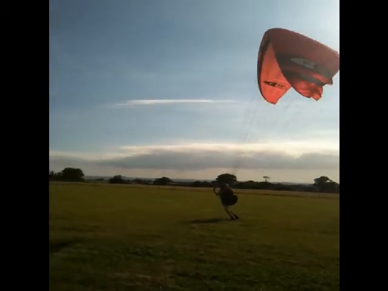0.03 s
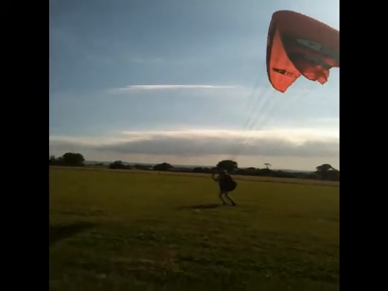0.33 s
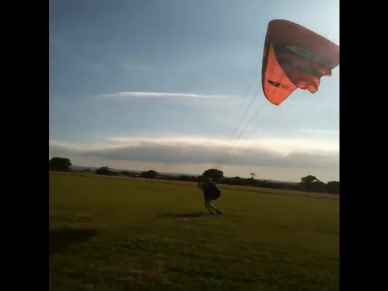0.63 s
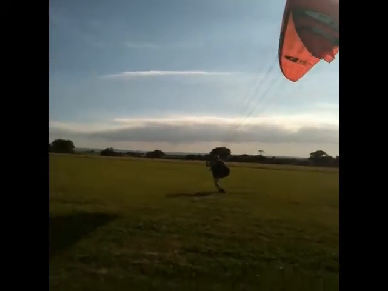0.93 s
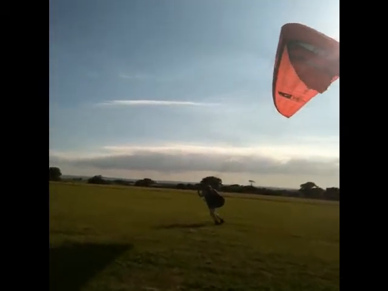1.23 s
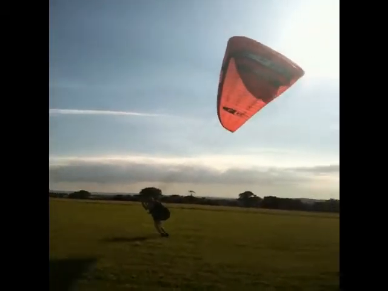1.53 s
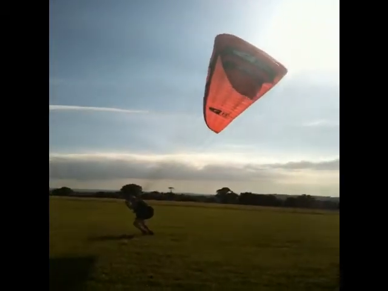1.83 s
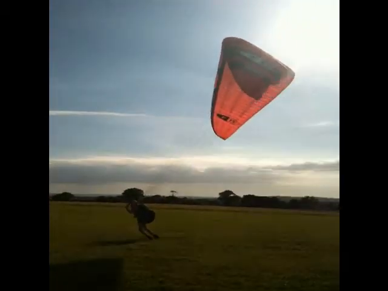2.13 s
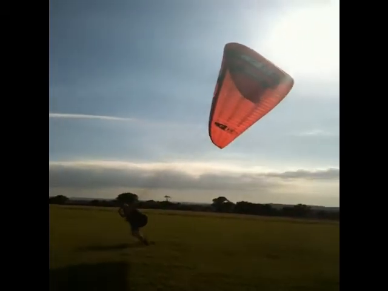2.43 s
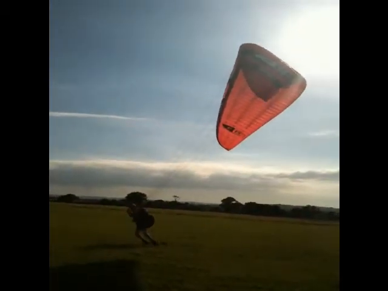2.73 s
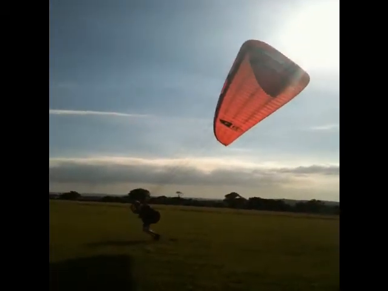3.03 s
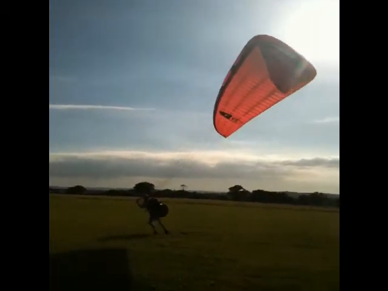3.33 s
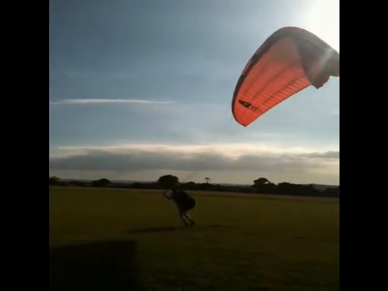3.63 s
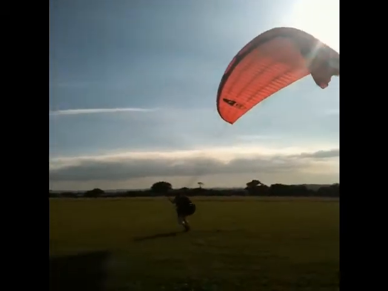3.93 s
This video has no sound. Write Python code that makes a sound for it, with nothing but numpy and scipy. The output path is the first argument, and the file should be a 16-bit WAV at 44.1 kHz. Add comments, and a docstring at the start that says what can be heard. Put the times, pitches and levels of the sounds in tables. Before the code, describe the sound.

Wind buffets the microphone throughout with a dull rumble, sputter and short thumps. It starts in uneven puffs, blows hardest from about 0.9 to 2.3 seconds, then comes in separate gusts and weakens after 3.4 seconds. Behind it, a paraglider's cloth swishes faintly, swelling near 1.4, 2.2 and 3.1 seconds, with a few tiny ticks and a barely audible whistle from its lines. A soft outdoor hush lies underneath.

```python
"""Dull rumble, sputter and single thumps: gusty wind buffets a small microphone in an open field.
Each is the pressure of eddies hitting the microphone, thinned by its bass cut.
Nearby a fabric wing is flown: its cloth swishes in swells and ticks, and its lines whistle faintly.
A soft draught and the steady air over the field lie underneath."""
import sys
import numpy as np
from scipy import signal
from scipy.fft import rfft, irfft
from scipy.io import wavfile

SR = 44100
rng = np.random.default_rng(int(sys.argv[2]) if len(sys.argv) > 2 else 0)


def unload_audio(sound):
    """Save the sound as a 16-bit wav file, at the path given as the first command line argument."""
    columns = np.transpose(np.atleast_2d(sound))
    # keep every value between -1 and 1, then stretch to whole-number steps
    steps = np.round(np.clip(columns, -1, 1) * 32767)
    wavfile.write(sys.argv[1], SR, steps.astype(np.int16))


N = 176400
T, HZ = np.arange(N) / SR, np.fft.rfftfreq(N, 1 / SR) + 1e-3


def amp(db):
    """Decibels to gain."""
    return 10 ** (np.asarray(db) / 20)


def unit(x):
    """Scales to rms 1."""
    return x / np.sqrt(np.mean(x ** 2) + 1e-20)


def add(mix, start_s, sound):
    """Mixes a sound in at a time."""
    part = mix[max(round(start_s * SR), 0):][:len(sound)]
    part += sound[:len(part)]


def colour(x, curve):
    """Shapes a signal with an EQ curve of (frequency [Hz], gain [dB]), then scales it to rms 1."""
    hz, db = np.transpose(curve)
    gain = amp(np.interp(np.log(HZ), np.log(hz), db))
    return unit(irfft(rfft(x) * gain, N))


def noise(curve):
    """White noise through an EQ curve."""
    return colour(rng.standard_normal(N), curve)


def band(hz, octaves, size=N):
    """Noise in one bell-shaped band."""
    bins = np.fft.rfftfreq(size, 1 / SR) + 0.0012
    bell = np.exp(-.5 * (np.log2(bins / hz) / octaves) ** 2)
    return unit(irfft(rfft(rng.standard_normal(size)) * bell, size))


def flicker(depth_db, rate_hz):
    """A gain that drifts at random, up to about the given rate."""
    drift = irfft(rfft(rng.standard_normal(N)) / (1 + (HZ / rate_hz) ** 4), N)
    return amp(depth_db * unit(drift))


def steady(x, smooth_s=0.0066):
    """Evens out chance swells, so that the gusts set the level."""
    window = np.exp(-.5 * (np.arange(-4000, 4001) / SR / smooth_s) ** 2)
    power = signal.fftconvolve(x ** 2, window / window.sum(), "same")
    return x / np.sqrt(abs(power) + 1e-12)


def bass_cut(x, ring_hz=196, q=1.234, port_hz=79):
    """The microphone's bass cut: every push swings back and rings briefly."""
    w = 2 * np.pi * ring_hz / SR
    ringing = signal.lfilter(*signal.bilinear([1, 0, 0], [1, w / q, w * w]), x)
    return signal.lfilter(*signal.butter(1, port_hz, "high", fs=SR), ringing)


def buffeting(eddies_per_s=600, spread_db=5, full_gust_db=-20.5):
    """Large eddies rumble on the microphone and small ones sputter, in the same lumps."""
    # wind strength at the microphone, in two consecutive lists (time [s], relative level [dB])
    gusts = [
        [(0.0, -18.5), (0.02, -14.5), (0.1, -22), (0.25, -31.5), (0.28, -24), (0.31, -34), (0.32, -37),
         (0.40, -26), (0.425, -40.5), (0.47, -24.5), (0.535, -18), (0.555, -37), (0.63, -36), (0.65, -34.5),
         (0.7, -28), (0.78, -30.5), (0.85, -27), (0.9, -14.5), (0.97, -25.5), (1.01, -25.5), (1.06, -37),
         (1.09, -22.5), (1.155, -33.5), (1.175, -19.5), (1.205, -32.5), (1.225, -12.5), (1.245, -30.5),
         (1.27, -21.5), (1.345, -13), (1.38, -19), (1.45, -14.5), (1.5, -20.5), (1.57, -16), (1.59, -21),
         (1.71, -20.5), (1.77, -23), (1.79, -37.5), (1.82, -27), (1.84, -47.5), (1.88, -20.5), (1.893, -37),
         (1.925, -20.5), (1.942, -33), (1.96, -17), (2.0, -17.5)],
        [(2.012, -29), (2.04, -17), (2.053, -28), (2.075, -17), (2.1, -19), (2.13, -16.5), (2.154, -18.5),
         (2.248, -21.5), (2.342, -39), (2.374, -32.5), (2.398, -50), (2.436, -36), (2.452, -34), (2.486, -21),
         (2.552, -22.5), (2.592, -65), (2.68, -27), (2.696, -45), (2.73, -30), (2.79, -37.5), (2.868, -21),
         (2.902, -36.5), (2.985, -23.5), (3.034, -27), (3.046, -37.5), (3.09, -18), (3.156, -32), (3.184, -44),
         (3.222, -36.5), (3.262, -24.5), (3.275, -39.5), (3.296, -17), (3.334, -30.5), (3.362, -23.5),
         (3.39, -37), (3.49, -28), (3.522, -53), (3.538, -32), (3.594, -59.5), (3.638, -27), (3.666, -54),
         (3.684, -42.5), (3.9, -37.5), (3.91, -52), (4.0, -44)],
    ]
    # pressure spectrum of the large eddies (frequency [Hz], relative level [dB])
    rumble_eq = [(25, 7), (45, 0), (75, -18), (120, 4.5), (180, 4), (280, -6), (420, -10), (600, -26.5),
                 (900, -32.5), (1600, -45.5), (4000, -104)]
    # pressure spectrum of the small eddies (frequency [Hz], relative level [dB])
    sputter_eq = [(100, 18), (300, -10.5), (520, 2), (750, -9), (1100, -22.5), (1500, -34), (2400, -40.5),
                  (4000, -51.5), (12000, -74)]
    gust_db = np.interp(T, *np.vstack(gusts).T)
    lumps = flicker(depth_db=3, rate_hz=80)
    rumble = steady(bass_cut(noise(rumble_eq))) * amp(gust_db - 3)
    hits = (rng.random(N) < eddies_per_s / SR) * rng.choice([-1, 1], N)
    eddies = hits * amp(spread_db * rng.standard_normal(N))
    # the sputter gains on the rumble as the wind rises
    sputter_db = gust_db - 14 + 0.53 * (gust_db - full_gust_db)
    sputter = steady(bass_cut(colour(eddies, sputter_eq))) * amp(sputter_db)
    return lumps * (rumble + sputter)


def thumps(rise=1.806, lead_s=.01):
    """Each strong eddy is one pressure push: a quick rise and a slower fall."""
    # strong single eddies (time [s], relative peak [dB], fall time [ms])
    strong_eddies = [(0.0227, -10, 0.62), (0.0693, -10.5, 0.9), (0.1179, -6, 0.93), (0.1414, -11.5, 0.82),
                     (0.273, -8, 1), (0.327, -12.5, 0.82), (0.4707, -8, 0.73), (0.5344, -13.5, 0.59),
                     (0.7048, -11.5, 0.99), (0.8765, -15, 0.62), (.891, -15.5, 0.39), (0.8973, 1.5, 0.54),
                     (0.9234, -8.5, 0.51), (0.933, -8, .8), (0.952, -13.5, 0.27), (1.1693, -9, 0.79),
                     (1.179, -11, 0.64), (1.217, -22, 0.35), (1.2309, -4.5, 0.78), (1.266, -11.5, .65),
                     (1.3366, -7, 0.62), (1.3491, -8, 0.4), (1.3625, -6, 0.42), (1.377, -12, 0.32),
                     (1.4205, -12, 0.33), (1.452, -7.5, 0.52), (1.468, -13, 0.37), (1.507, -12.5, 0.51),
                     (1.5562, -9.5, 0.32), (1.5656, 0.5, 0.42), (1.567, -17, 0.15), (1.581, -15.5, 0.32),
                     (1.643, -15, 0.44), (1.6663, -6, 0.5), (1.6957, -6.5, 0.55), (1.7234, -10.5, 0.64),
                     (1.73, -10.5, .36), (1.7399, -9, 0.28), (1.7503, -6.5, 0.5), (1.763, -12.5, 0.34),
                     (1.8245, -18.5, 0.34), (1.8779, -17, 0.53), (1.964, -3.5, 0.55), (1.976, -19, 0.29),
                     (1.997, -4.5, 0.64), (1.9999, -16, 0.23), (2.041, -5, 0.7), (2.0768, -4.5, 0.76),
                     (2.1131, -12, 0.41), (2.1246, -5.5, 0.9), (2.133, -17, 0.31), (2.172, -10, 0.31),
                     (2.219, -22, .22), (2.245, -5.5, 0.56), (2.464, -5.5, 0.72), (2.4893, -3.5, 1),
                     (2.494, -9, 1), (2.7431, -20.5, 0.45), (2.862, -14, 0.74), (2.873, -10.5, 1),
                     (2.9381, -7.5, 0.95), (2.978, -4, 0.7), (2.9885, -9.5, 0.92), (3.0178, -11.5, 0.73),
                     (3.0854, -2.5, 0.98), (3.0963, -11.5, 1), (3.117, -17, 0.99), (3.225, -14, 1),
                     (3.291, -5.5, 0.46), (3.2983, -20.5, 0.18), (3.353, -11, 0.39), (3.4175, -14.5, 0.69),
                     (3.477, -13, 0.87), (3.486, -23, 0.73)]
    out = np.zeros(N)
    ms = (T[:2000] - lead_s) * 1000
    for s, db, fall_ms in strong_eddies:
        age = ms / fall_ms
        push = np.exp(-np.logaddexp(-rise * age, age))
        thump = bass_cut(push)
        add(out, s - lead_s, amp(db - 4) * thump / abs(thump).max())
    return out


def flurries(taper=3.5):
    """Tight clusters of eddies rasp over the microphone and are gone."""
    # clusters of small eddies (middle [s], length [s], relative level [dB], band centre [Hz])
    clusters = [(0.021, 0.024, -30.5, 540), (0.457, 0.0065, -29, 410), (0.476, 0.011, -35.5, 600),
                (.52, 0.024, -44, 260), (0.614, 0.017, -29, 284), (0.732, 0.0096, -25.5, 396),
                (.89, 0.02, -22, 440), (0.992, 0.0056, -22.5, 438), (1.1, 0.025, -33, 280),
                (1.177, 0.0051, -31, 426), (1.226, .012, -38, 485), (1.314, 0.014, -29.5, 490),
                (1.345, 0.028, -24.5, 404), (1.421, 0.0051, -22, 596), (1.568, 0.018, -30, 633),
                (1.666, 0.0065, -29.5, 470), (1.738, 0.033, -32, 704), (1.824, 0.0047, -28, 574),
                (1.954, 0.0073, -14, 242), (1.968, 0.0065, -24.5, 820), (1.99, 0.011, -21.5, 730),
                (2.038, 0.0099, -28, 390), (2.08, 0.018, -33, 440), (2.11, 0.012, -27, 584),
                (2.294, 0.0072, -27, 275), (2.324, 0.013, -33, 215), (2.366, 0.012, -24.5, 180),
                (2.505, 0.014, -27, 400), (2.533, 0.013, -22, 344), (2.676, 0.017, -37.5, 480),
                (2.744, 0.011, -36.5, 430), (2.826, 0.011, -30.5, 265), (3.244, 0.0095, -31.5, 387),
                (3.294, 0.013, -28, 780), (3.316, 0.0061, -26.5, 333), (3.419, 0.02, -35, 423),
                (3.632, 0.017, -38.5, 270), (3.682, 0.012, -34.5, 272), (3.731, 0.033, -35, 320),
                (3.774, 0.013, -30.5, 230), (3.825, 0.016, -42, 235), (3.885, 0.021, -33, 214)]
    out = np.zeros(N)
    t = T[:2048] - T[800]  # time from the middle of a flurry
    for s, length, db, hz in clusters:
        envelope = np.exp(-abs(2 * t / length) ** taper)
        rasp = unit(band(hz, octaves=.58, size=len(t)) * envelope)
        duty = length * SR / len(t)  # the level holds over the flurry's own length
        add(out, s + t[0], amp(db - 2.5) * np.sqrt(duty) * rasp)
    return out


def cloth():
    """Air sweeps over the wing: a crinkly fizz above a lower rustle."""
    # swells of the cloth (time [s], relative level [dB], extra gain on the rustle [dB])
    swells = [(0.02, -68.5, 4.5), (0.2, -71, 3), (0.52, -65.5, 3.5), (0.62, -73.5, 12), (0.67, -66, 4.5),
              (0.73, -56, -4), (0.82, -58.5, -2), (0.93, -65, 4), (1.011, -62, 1), (1.22, -66.5, 0.5),
              (1.4, -47.5, -4.5), (1.54, -59.5, 0), (1.56, -51.5, 0.5), (1.58, -60, -1), (1.79, -61, -0.5),
              (1.84, -69, 7.5), (1.94, -64.5, 1.5), (1.98, -69, 10), (2.04, -57.5, -1), (2.07, -60, -3),
              (2.13, -51.5, -3), (2.23, -52, -3), (2.35, -62.5, 1), (2.7, -58.5, -4.5), (2.74, -65.5, 3.5),
              (2.87, -67.5, 7), (3.049, -56.5, -1.5), (3.09, -51, 5), (3.15, -56.5, 0.5), (3.21, -60, 2),
              (3.3, -56, -3.5), (3.43, -58.5, -3.5), (3.68, -70.5, 7.5), (3.73, -64.5, 3.5), (3.79, -69, 8),
              (3.9, -56, 1), (4.0, -67, 4.5)]
    # treble of the cloth (frequency [Hz], relative level [dB])
    fizz_eq = [(1500, 3.5), (3000, -8), (4400, 0.5), (5500, 0.5), (6300, -1), (7300, 1), (8500, 0.5),
               (10500, -3.5), (13000, -4.5), (15500, -4)]
    # midrange of the cloth (frequency [Hz], relative level [dB])
    rustle_eq = [(300, 0), (900, 6.5), (1600, 5), (2300, 3), (3000, 1), (3800, -2), (5000, -9.5),
                 (9000, -18)]
    s, db, extra_db = np.transpose(swells)
    fizz = noise(fizz_eq) * amp(2 + np.interp(T, s, db))
    rustle = noise(rustle_eq) * amp(2.5 + np.interp(T, s, db + extra_db))
    crinkle = flicker(depth_db=1.2, rate_hz=250)
    return (fizz + rustle) * crinkle


def ticks(decay_s=0.0013):
    """Cloth and lines give tiny bright snaps that die at once."""
    # snaps of cloth and lines (time [s], peak [dB], band centre [Hz])
    snaps = [(1.0373, -43.5, 4300), (1.057, -51, 7500), (1.068, -48, 14000), (1.1315, -42.5, 7700),
             (1.149, -46, 7800), (1.169, -44, 2570), (1.554, -44, 3750), (1.682, -43, 11300),
             (1.781, -38, 8200), (2.04, -42, 7940), (3.404, -39, 10300)]
    out = np.zeros(N)
    decay = np.exp(-T[:2048] / decay_s)
    for s, db, hz in snaps:
        snap = band(hz, octaves=0.36, size=len(decay)) * decay
        add(out, s, amp(db) * snap / abs(snap).max())
    return out


def whistles():
    """Taut lines sing in narrow bands that swell, waver and fade."""
    # notes of the lines (middle [s], half length [s], pitch [Hz], level [dB], width [octaves])
    notes = [(0.736, .05, 4750, -64, 0.11), (1.647, 0.11, 8900, -63.5, .22), (3.007, 0.24, 3570, -66, .1),
             (3.08, 0.14, 4370, -65, .1)]
    song = np.zeros(N)
    for s, half_s, hz, db, octaves in notes:
        swell = np.exp(-.5 * ((T - s) / half_s) ** 2)
        song += band(hz, octaves) * amp(db) * swell
    return song * flicker(depth_db=3, rate_hz=20)


def draught():
    """A soft draught never leaves the microphone: a low bed under the gusts."""
    # spectrum of the draught (frequency [Hz], relative level [dB])
    draught_eq = [(25, 7.5), (45, 4.5), (80, 3.5), (130, 5.5), (200, -1.5), (400, -36), (1500, -62)]
    return amp(-42.5) * noise(draught_eq)


def field_air():
    """Steady air over the field makes a faint hush."""
    # spectrum of the open air (frequency [Hz], relative level [dB])
    air_eq = [(30, 21.5), (150, 18), (500, -9), (1000, 14.5), (1600, 15.5), (2600, -5), (4500, -60),
              (9000, -32), (15500, -11)]
    return amp(-62) * noise(air_eq)


def scene():
    """Wind on the microphone up front, the wing and the field behind it, in mono."""
    wind = buffeting() + thumps() + flurries()
    wing = cloth() + ticks() + whistles()
    return (wind + wing + field_air() + draught())[None]


def record(dry, sub_cut_hz=93.4, top_hz=15850):
    """The recorder cuts the sub-bass steeply and shaves off the very top."""
    trimmed = signal.lfilter(*signal.butter(3, sub_cut_hz, "high", fs=SR), dry)
    lowpass = signal.firwin(511, top_hz, window=("kaiser", 9), fs=SR)
    return signal.oaconvolve(trimmed, lowpass[None], "same")


dry = scene()
out = record(dry)
unload_audio(out)
```